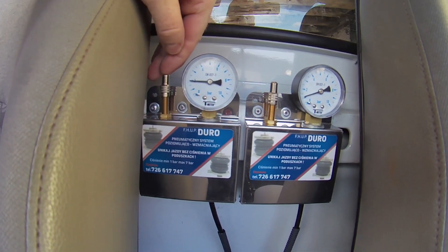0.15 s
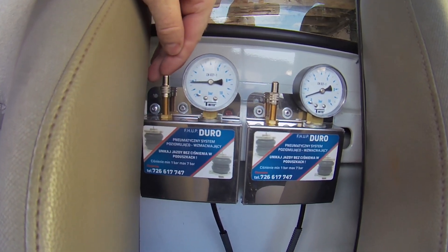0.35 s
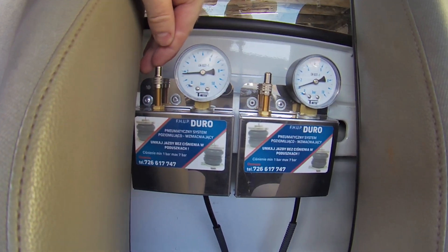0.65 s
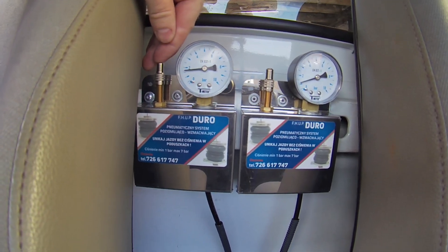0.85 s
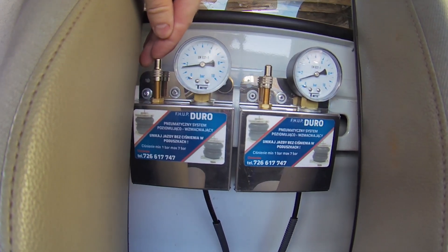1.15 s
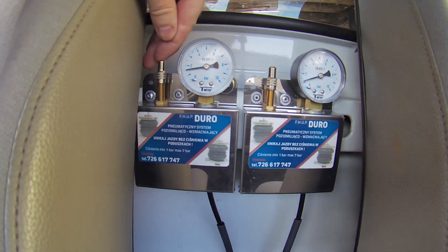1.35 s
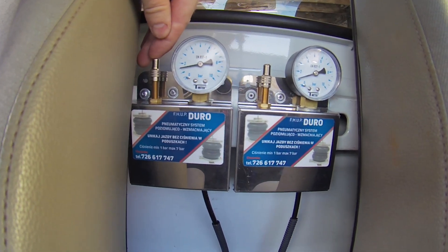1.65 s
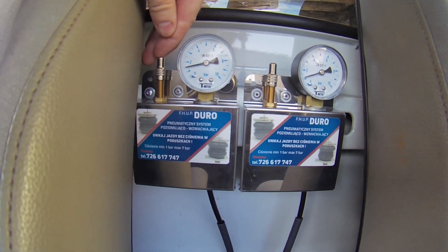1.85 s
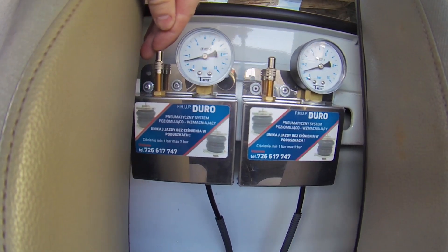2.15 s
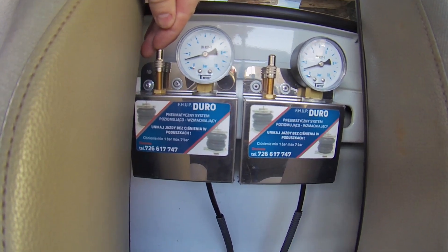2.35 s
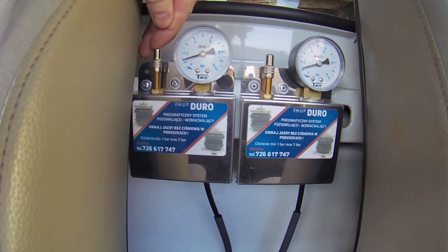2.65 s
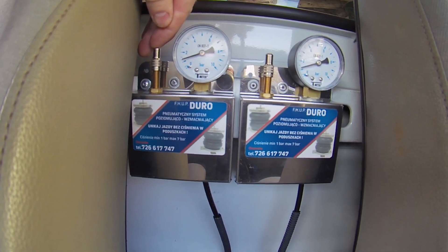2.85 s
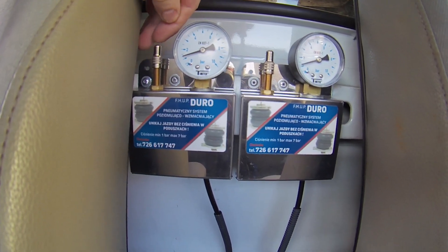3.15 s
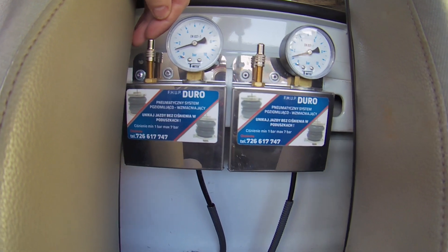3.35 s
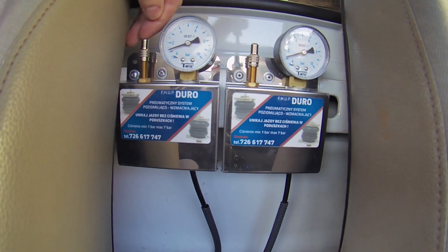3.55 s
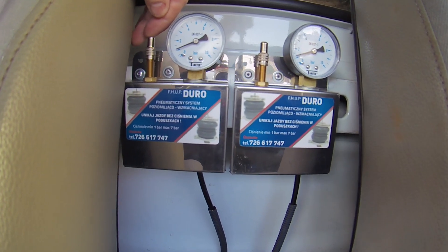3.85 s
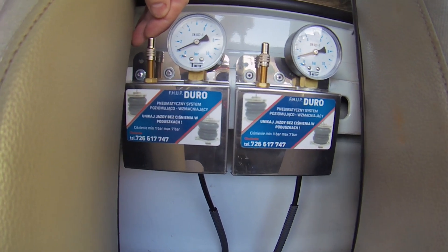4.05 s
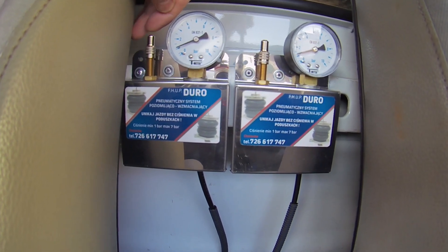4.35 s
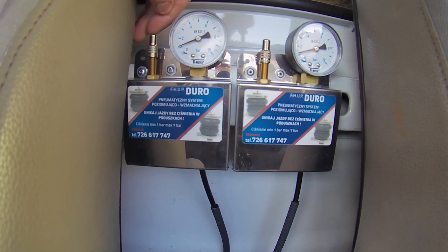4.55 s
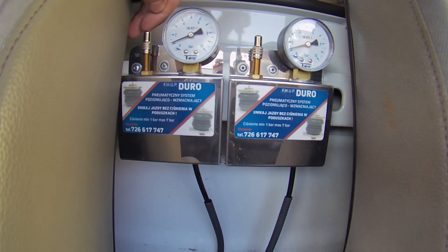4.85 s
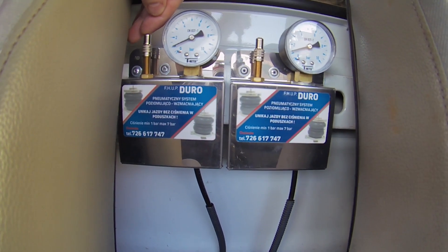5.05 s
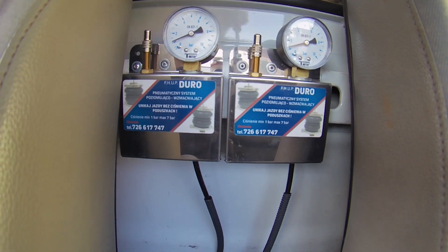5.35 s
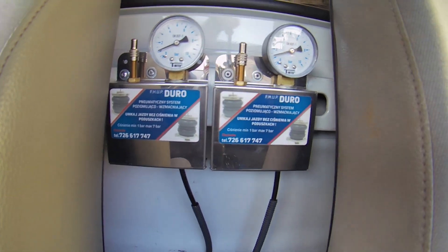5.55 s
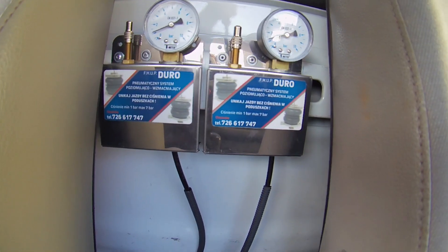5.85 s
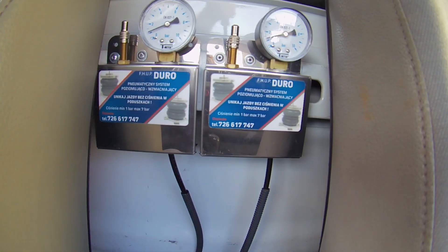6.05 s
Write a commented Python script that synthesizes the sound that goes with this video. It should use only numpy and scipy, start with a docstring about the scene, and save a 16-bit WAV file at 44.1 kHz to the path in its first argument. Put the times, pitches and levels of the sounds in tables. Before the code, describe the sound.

Compressed air escapes from a small valve pressed by a fingertip, close to the microphone inside a parked vehicle. One steady, high hiss lasts about three seconds and stops with a sharp snap. A shorter hiss follows, then two brief spurts and a light metallic knock as the valve is released. A faint low rumble and distant traffic drone continue underneath.

```python
"""Letting air out of an air suspension

In a parked vehicle a fingertip presses the pin of a tyre-type valve: one long hiss of turbulent air,
a shorter one, two brief ones. The pin snaps shut and the valve knocks against its panel.
Gauge panel and padded cabin reflect the jet. A low rumble and the drone of traffic come through
the body, over a soft hiss and a thin whine."""
import sys
import numpy as np
from scipy import signal
from scipy.fft import rfft, irfft, next_fast_len
from scipy.io import wavfile
from scipy.ndimage import uniform_filter1d, map_coordinates

SR = 44100
rng = np.random.default_rng(int(sys.argv[2]) if len(sys.argv) > 2 else 0)


def unload_wav(signal):
    """Save mono or channel-first audio to the path in sys.argv[1] as 16-bit WAV at rate SR, clipped to [-1, 1]."""
    wavfile.write(
        sys.argv[1],
        SR,
        np.round(np.clip(np.atleast_2d(signal).T, -1, 1) * 32767).astype(np.int16),
    )


N = 274302
TIME = np.arange(N) / SR


def gain_of(db):
    """Decibels to amplitude."""
    return 10 ** (np.asarray(db) / 20)


def unit_rms(x):
    """Scales to rms 1."""
    return x / np.sqrt(np.mean(x ** 2) + 1e-20)


def db_at(spectrum, hz):
    """Interpolates a spectrum over log frequency."""
    f, db = np.transpose(spectrum)
    return np.interp(np.log(hz + 1), np.log(f + 1), db)


def add(mix, start_s, sound):
    """Mixes a sound in at start_s."""
    part = mix[round(start_s * SR):][:len(sound)]
    part += sound[:len(part)]


def noise(spectrum, size=N):
    """Steady noise, rms 1, of the given relative spectral density."""
    n = next_fast_len(size, True)
    shape = gain_of(db_at(spectrum, np.fft.rfftfreq(n, 1 / SR)))
    return unit_rms(irfft(rfft(rng.standard_normal(n)) * shape, n)[:size])


def wander(rate_hz, count=4096):
    """Random drift, rms 1, up to about rate_hz."""
    f = np.fft.rfftfreq(count, TIME[-1] / count)
    coarse = irfft(rfft(rng.standard_normal(count)) * (f > 0) / (1 + (f / rate_hz) ** 4))
    return np.interp(TIME, np.linspace(0, TIME[-1], count), unit_rms(coarse))


# Pushes on the pin: start t/s, press time/s, let-go t/s, shut time/s, level/dB,
# finger roll (0 on top, 1 aside, 2 at the rim)
PIN_PUSHES = [ (-0.12, .25, 0.25, .40, -36.2, .3), (0.21, .25, 3.025, .115, -26.8, .1),
              (3.05, .04, 3.105, .04, -47, .1), (3.262, .055, 3.315, .26, -48.8, .5),
              (3.338, .42, 4.28, .085, -28.2, .65), (3.52, .24, 3.76, .33, -27.6, 1.3),
              (4.602, .032, 4.705, .125, -45.3, 1.1), (4.866, .048, 4.912, .17, -37.3, 2.1),
              (4.86, .26, 5.13, .085, -29.9, .8), (5.205, .06, 5.265, .11, -54, .7),
              (5.29, .06, 5.345, .11, -61, .7), ]


def fingertip(sag_db_per_s=1.9):
    """The pin eases down, pressure sags, the pin springs shut ever faster. Returns flow/dB and roll."""
    power, weighted_roll = np.full(N, 1e-14), np.zeros(N)
    for start_s, press_s, let_go_s, shut_s, db, roll in PIN_PUSHES:
        opening = np.sin(np.pi / 2 * np.clip((TIME - start_s) / press_s, 0, 1)) ** 2
        sag_db = sag_db_per_s * (TIME - start_s)
        closing_db = 60 * (np.maximum(TIME - let_go_s, 0) / shut_s) ** 2
        push_power = (opening * gain_of(db - sag_db - closing_db)) ** 2
        power += push_power
        weighted_roll += roll * push_power
    return 10 * np.log10(power), weighted_roll / power


# Free jet: f/Hz, level/dB
JET_SPECTRUM = [(100, -37.5), (400, -28), (700, -25.5), (1300, -22.5), (2400, -17), (3250, -19.5),
                (4500, -12.5), (6000, -11), (7200, -5.5), (8800, -2), (10000, -6.5), (11400, -16),
                (12600, -15.5), (14000, -17.5)]
# Change of colour 20 dB under full flow: f/Hz, lift/dB
WEAK_JET_TILT = [(300, 8), (1200, 3), (2400, -4.5), (3800, 3), (4800, -5), (6000, 3), (7200, -6),
                 (8500, 1.5), (9800, -0.5), (11000, 0), (14000, -1)]
# Valve-to-finger gap resonances: f/Hz, width/Hz, lift with finger on top/dB, lift with finger aside/dB
GAP_MODES = [(4140, 150, -0.5, 0.5), (4440, 530, -3, -4), (5280, 240, 2, 2), (6510, 740, 0.5, 2.5),
             (7350, 1300, 2.5, 0.5), (8050, 1200, -3, 1), (8220, 490, 0.5, 4), (9130, 740, 3.5, 2),
             (10800, 530, 0.4, 4), (13940, 420, 6, -1.5)]


def jet(full_flow_db=-31, gap_fade=.7, eddy_db=1.06, flutter_db=.42, sputter_db=.6):
    """Turbulent air, coloured by the gap under the fingertip; a weak jet is thinner and less steady."""
    flow_db, finger_roll = fingertip()
    weakness = np.clip((full_flow_db - flow_db) / 20, 0, 1.3)
    framing = dict(nperseg=1024, noverlap=768)
    hz, frame_s, white = signal.stft(rng.standard_normal(N), SR, **framing)
    roll, weak = np.interp(frame_s, TIME, finger_roll), np.interp(frame_s, TIME, weakness)
    colour_db = db_at(JET_SPECTRUM, hz)[:, None] + np.outer(db_at(WEAK_JET_TILT, hz), weak)
    excitation = 1 - gap_fade * weak  # a weak jet barely excites the gap
    for centre_hz, width_hz, top_db, aside_db in GAP_MODES:
        bell = .5 ** ((2 * (hz - centre_hz) / width_hz) ** 2)
        lift_db = top_db + roll * (aside_db - top_db)
        colour_db += np.outer(bell, lift_db * excitation)
    # eddies briefly lift patches of the spectrum
    eddies = uniform_filter1d(rng.standard_normal(white.shape), size=9, axis=0)
    eddies = unit_rms(uniform_filter1d(eddies, size=8, axis=1))
    shape = gain_of(colour_db + eddy_db * eddies)
    shape /= np.sqrt((shape ** 2).mean(0))
    air = signal.istft(white * shape, **framing)[1][:N]
    unsteady_db = (flutter_db + sputter_db * weakness) * wander(86)
    return air * gain_of(flow_db + unsteady_db)


# Rumble: f/Hz, level/dB
RUMBLE_SPECTRUM = [(8, -8), (20, -20), (26, 1.5), (31, 0), (37, -11.5), (45, -12.5), (54, -14.5),
                   (66, -28.5), (100, -30.5), (140, -37.5), (220, -47.5), (400, -79)]
# Rumble envelope: t/s, level/dB
RUMBLE_LEVELS = [(0, -42), (0.75, -35.5), (1.4, -39), (5.6, -39.5), (6.2, -33.5)]


def rumble(waver_db=.9):
    """Deep, uneven noise through the vehicle body."""
    level_db = np.interp(TIME, *np.transpose(RUMBLE_LEVELS))
    return noise(RUMBLE_SPECTRUM) * gain_of(level_db + waver_db * wander(5.9))


# Still cabin: f/Hz, level/dB
CABIN_SPECTRUM = [(100, 5), (250, 2.5), (500, -4), (750, -5), (1020, -1.5), (1500, -8.5), (2800, -14),
                  (6300, -16.5), (7500, -10.5), (8600, -2), (9400, -15), (10300, -16), (14000, -23)]


def cabin(hiss_db=-63, whine_hz=9600, whine_db=-78.5, fuzz_hz=110):
    """A soft, even hiss and a thin whine of narrow-band noise."""
    phase = 2 * np.pi * whine_hz * TIME
    whine = wander(fuzz_hz) * np.cos(phase) + wander(fuzz_hz) * np.sin(phase)
    return gain_of(hiss_db) * noise(CABIN_SPECTRUM) + gain_of(whine_db) * whine


# Engines pulling: peak t/s, length/s, firing f/Hz, glide/(Hz/s), level/dB
ENGINE_PULLS = [ (0.12, .36, 142, 45, -59), (0.62, .26, 158, 30, -61), (1.35, 1.3, 86, 11, -58.5),
                (1.84, .36, 141, 30, -55.5), (2.41, .48, 149.5, 14, -57), (2.65, 1.2, 86.5, -9, -61.5),
                (4.45, .16, 158, 0, -63.5), (5.17, .55, 98, 14, -55), (5.9, .45, 107.5, 9, -58.5), ]


def traffic(waver_db=2.5, pitch_waver=.013):
    """Only the engines' firing notes get through the body; each pull swells and fades on a glide."""
    out = np.zeros(N)
    for peak_s, length_s, hz, glide_hz_per_s, db in ENGINE_PULLS:
        firing_hz = (hz + glide_hz_per_s * (TIME - peak_s)) * (1 + pitch_waver * wander(8.9))
        note = np.sqrt(2) * np.sin(2 * np.pi * np.cumsum(firing_hz) / SR)
        arch = np.cos(np.pi * np.clip((TIME - peak_s) / length_s, -.5, .5))
        out += gain_of(db) * arch * note
    return out * gain_of(waver_db * wander(10))


# Pin snaps: t/s, level/dB, t60/s
PIN_SNAPS = [(3.1405, -40.5, 0.095), (4.342, -54.5, 0.11), (5.544, -65, .04)]
# Spit of air: f/Hz, level/dB
SNAP_SPECTRUM = [(150, -25), (700, -9), (1300, -23), (2600, -32), (3600, -7), (5000, -8), (6200, -4),
                 (7000, -3), (8200, 6.5), (9500, -9), (11500, -24), (14000, -16)]


def pin_snaps(crack_db=6.0, crack_decay_s=.0011):
    """The pin snaps shut: a crack and a short spit of air."""
    out, t = np.zeros(N), TIME[:SR // 4]
    for start_s, db, t60_s in PIN_SNAPS:
        crack = gain_of(crack_db) * np.exp(-t / crack_decay_s)
        spit = gain_of(-60 * t / t60_s)
        add(out, start_s, noise(SNAP_SPECTRUM, len(t)) * gain_of(db) * (crack + spit))
    return out


# Valve knocks: t/s, ring level/dB, thud level/dB
VALVE_KNOCKS = [(3.144, -70, -53.5), (3.607, -58, -59), (5.157, -43.5, -56), (5.178, -62, -55)]
# Panel modes: f/Hz, relative level/dB, t60/s
PANEL_MODES = [(1490, 1, 0.055), (1810, -7, 0.056), (2370, -11, .05)]
# Dull thud: f/Hz, level/dB
THUD_SPECTRUM = [(80, -10), (200, 1), (450, -2), (750, 3), (1100, -11), (2200, -22), (5000, -45)]


def valve_knocks(thud_t60_s=.15, attack_s=.0024):
    """The valve knocks against its panel, which thuds and rings."""
    out, t = np.zeros(N), TIME[:SR // 4]
    ring = sum(gain_of(db - 60 * t / t60_s) * np.sin(2 * np.pi * hz * t)
               for hz, db, t60_s in PANEL_MODES)
    attack = 1 - np.exp(-t / attack_s)
    for start_s, ring_db, thud_db in VALVE_KNOCKS:
        thud = noise(THUD_SPECTRUM, len(t)) * gain_of(thud_db - 60 * t / thud_t60_s)
        add(out, start_s, (gain_of(ring_db) * ring + thud) * attack)
    return out


# Echoes off gauges, panel and seats: delay/ms, gain
NEAR_ECHOES = [(.75, 0.078), (.88, 0.019), (1.35, 0.036), (2.901, -0.011), (3.35, 0.08), (4.25, 0.1),
               (5.3, -0.021)]


def reflections(x, sway_ms=.055, wet_db=-13, t60_s=.062):
    """Adds near echoes that shift as the microphone sways, and the short tail the upholstery leaves."""
    near = x.copy()
    for delay_ms, gain in NEAR_ECHOES:
        lag_samples = (delay_ms + sway_ms * wander(.8)) * SR / 1000
        near += gain * map_coordinates(x, [np.arange(N) - lag_samples], order=3)
    t = TIME[:SR // 4]
    tails = rng.standard_normal((4, len(t))) * gain_of(-60 * t / t60_s) * (t > .004)
    paths = signal.fftconvolve(x[None], tails / np.linalg.norm(tails[0]), axes=1)[:, :N]
    # the sway crossfades the paths, so no pitch stands out
    shares = np.array([wander(3) for _ in tails])
    shares /= np.linalg.norm(shares, axis=0)
    return near + gain_of(wet_db) * (paths * shares).sum(0)


def scene():
    """The reflected valve sounds over the background, alike in both channels."""
    valve = jet() + pin_snaps() + valve_knocks()
    mono = reflections(valve) + traffic() + rumble() + cabin()
    return np.array([mono, mono])


def record(dry, cutoff_hz=13960):
    """Steep low-pass."""
    lowpass = signal.firwin(801, cutoff_hz, window=("kaiser", 9), fs=SR)
    return signal.oaconvolve(dry, lowpass[None], "same")


dry = scene()
out = record(dry)
unload_wav(out)
```